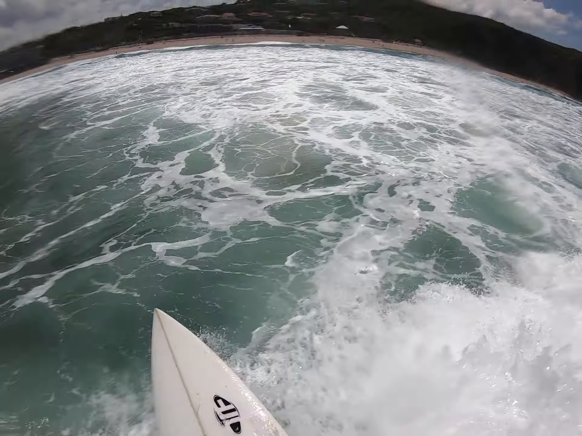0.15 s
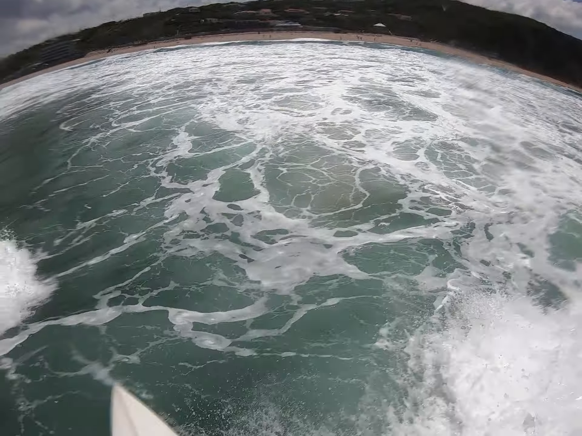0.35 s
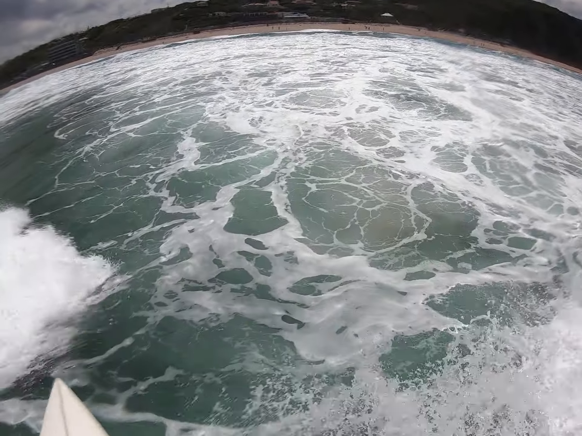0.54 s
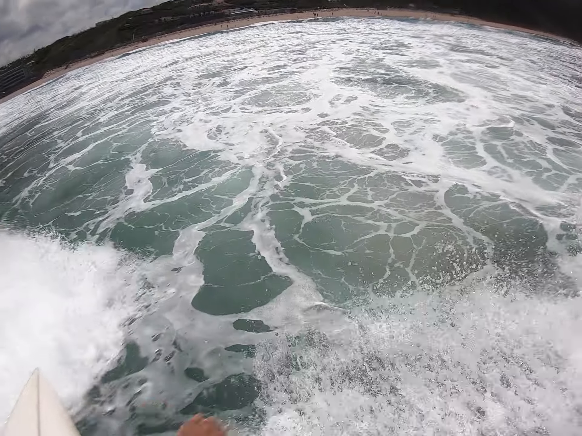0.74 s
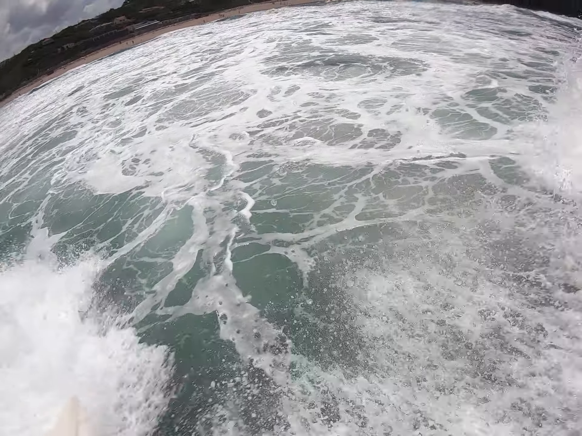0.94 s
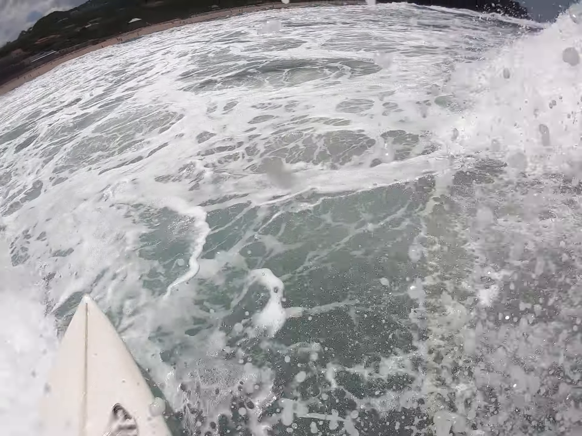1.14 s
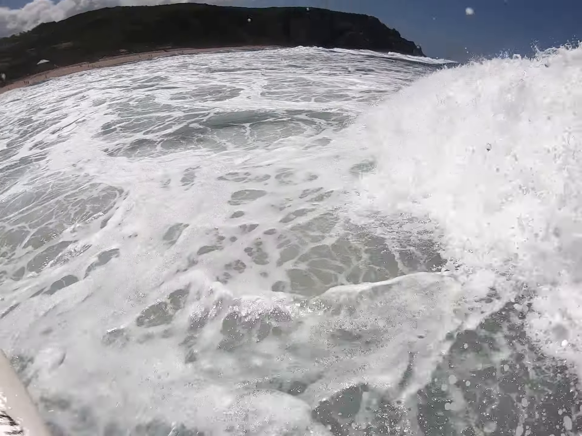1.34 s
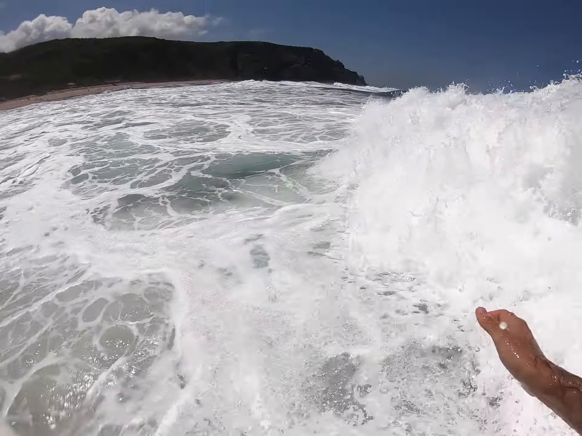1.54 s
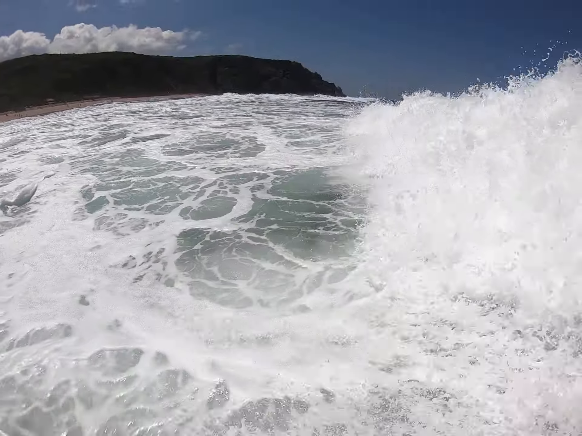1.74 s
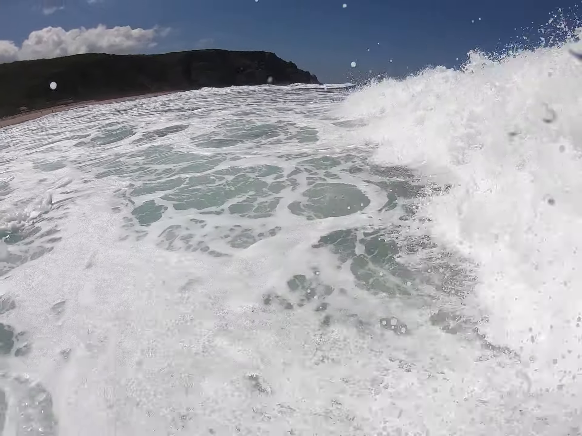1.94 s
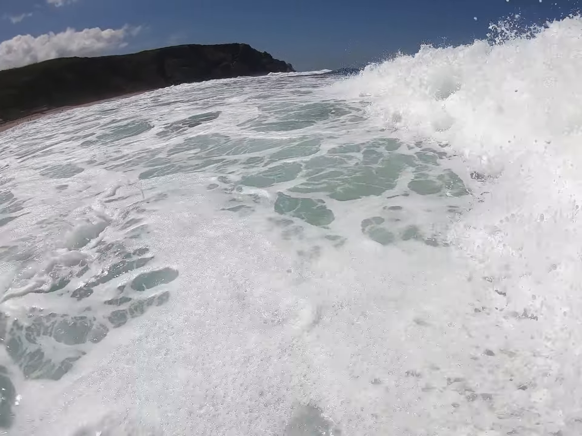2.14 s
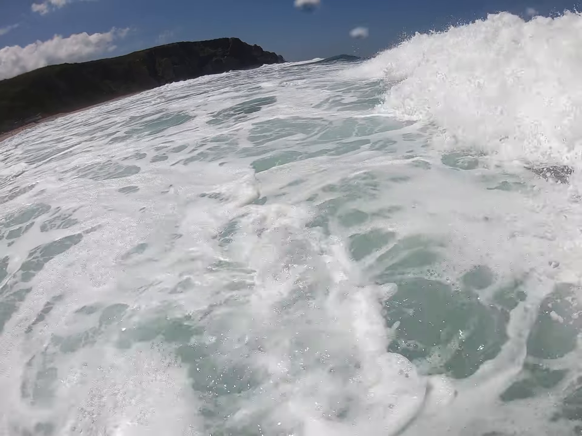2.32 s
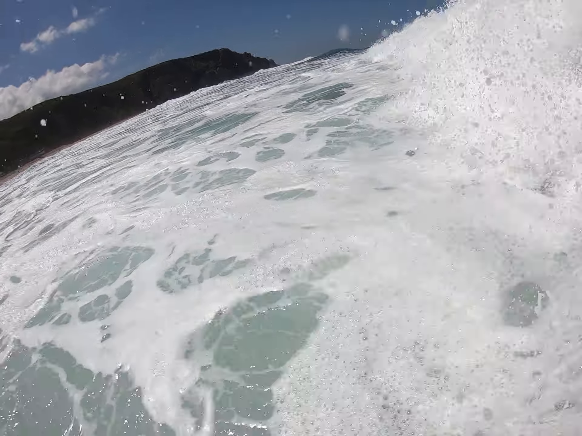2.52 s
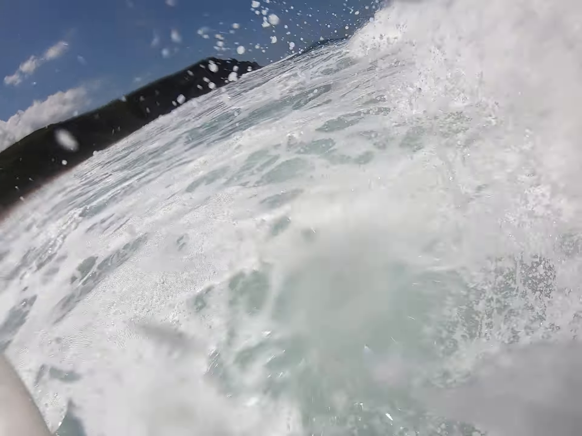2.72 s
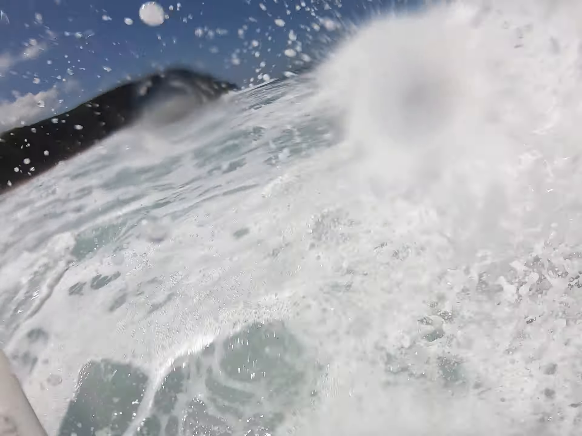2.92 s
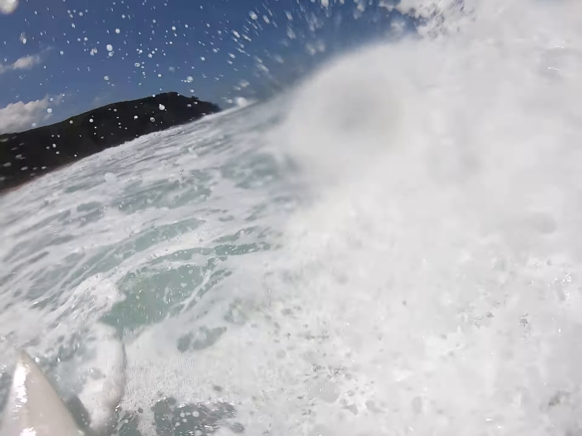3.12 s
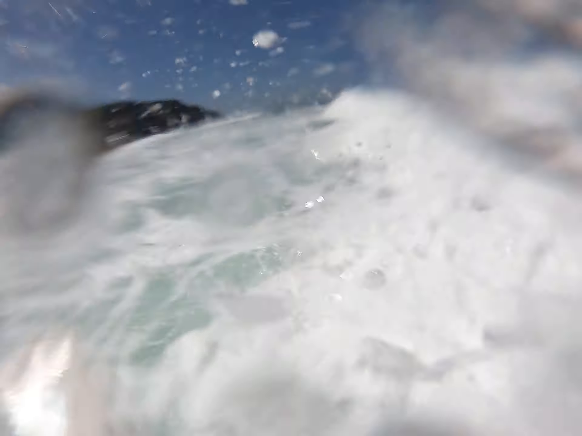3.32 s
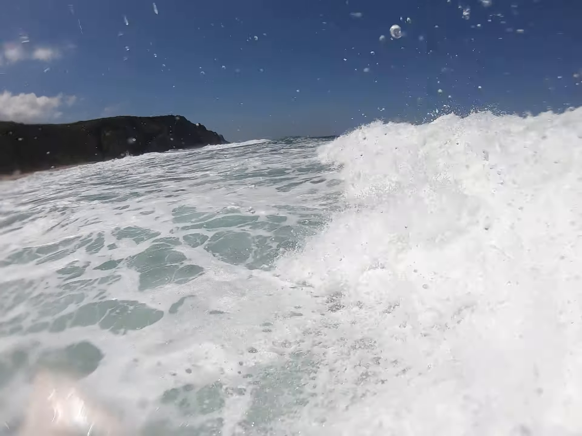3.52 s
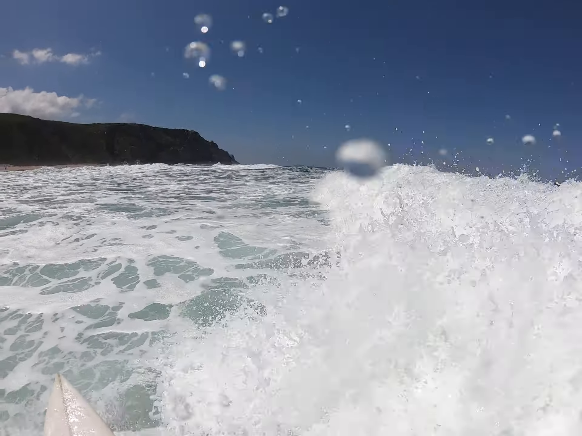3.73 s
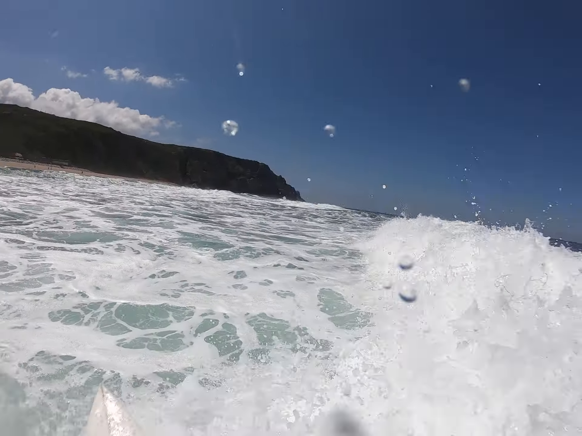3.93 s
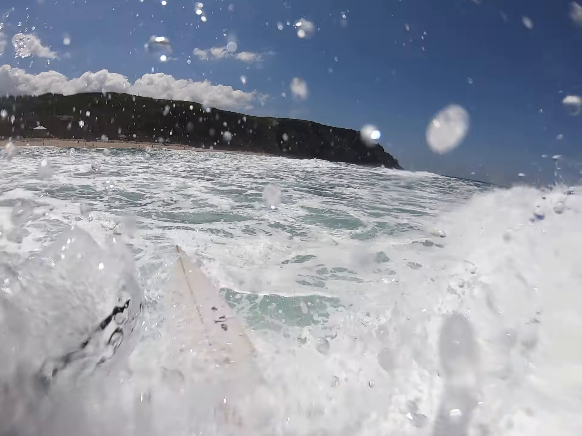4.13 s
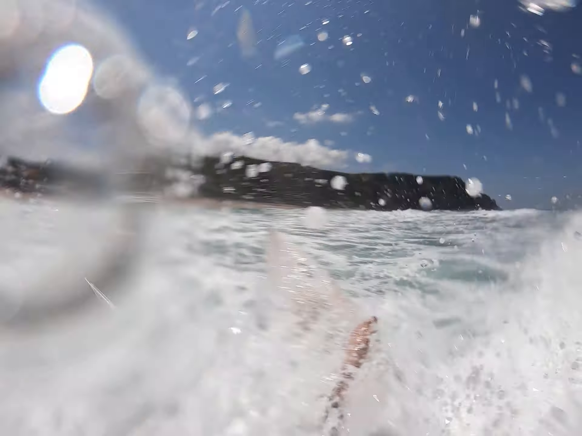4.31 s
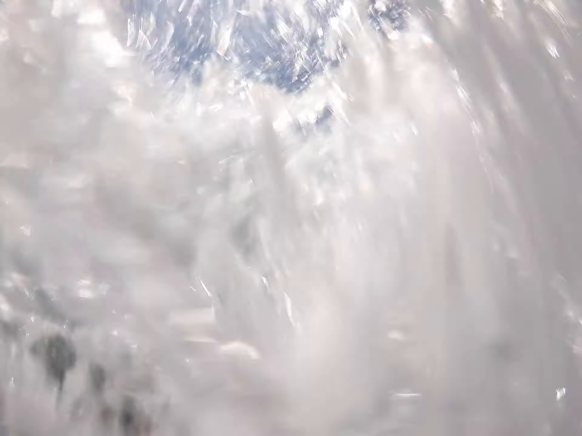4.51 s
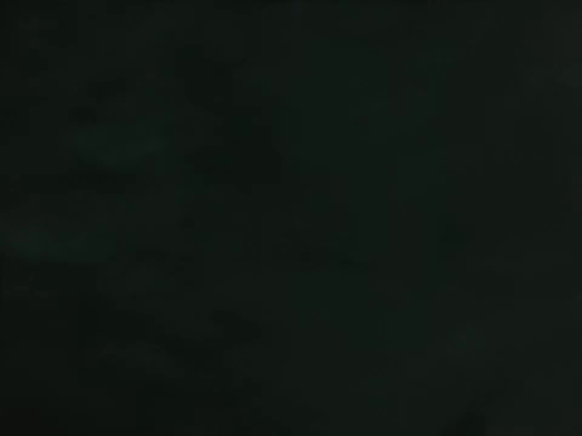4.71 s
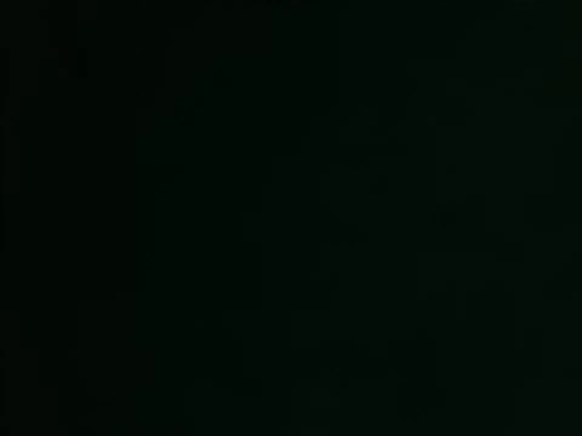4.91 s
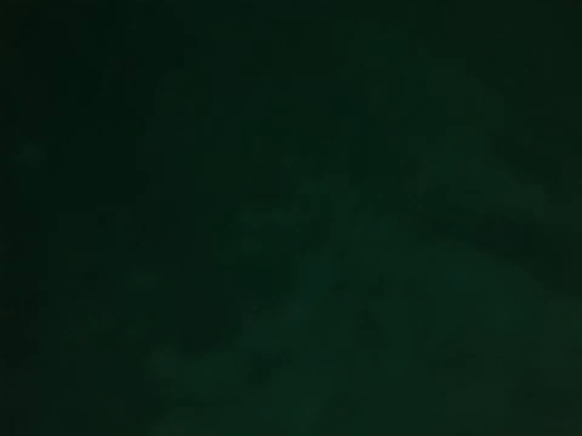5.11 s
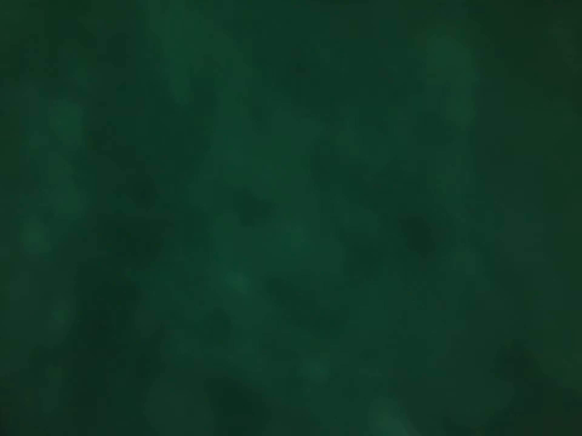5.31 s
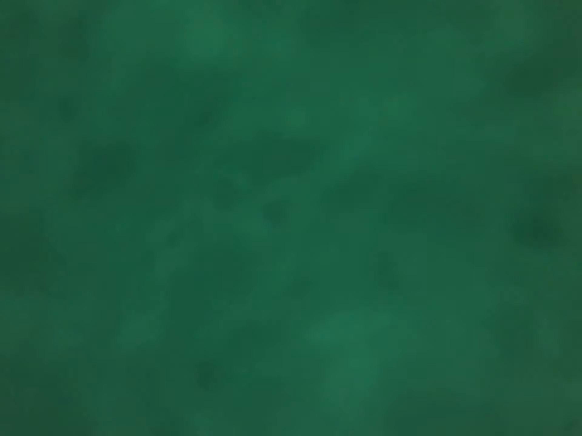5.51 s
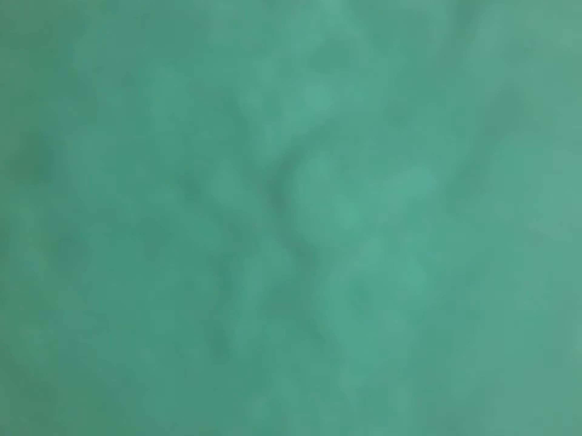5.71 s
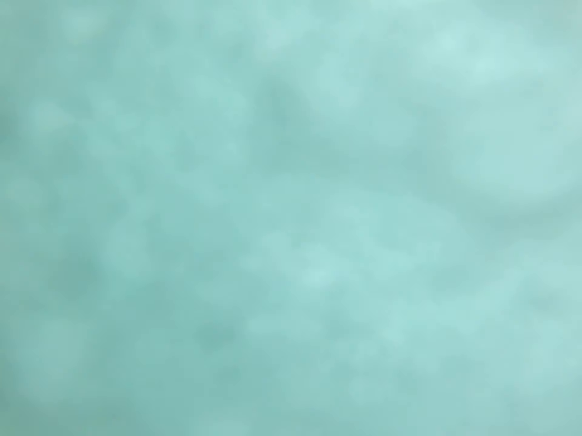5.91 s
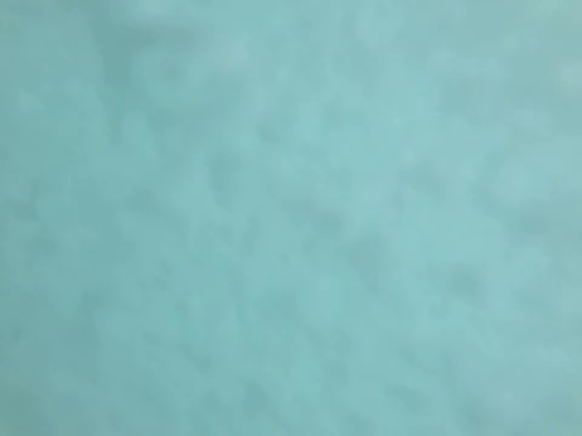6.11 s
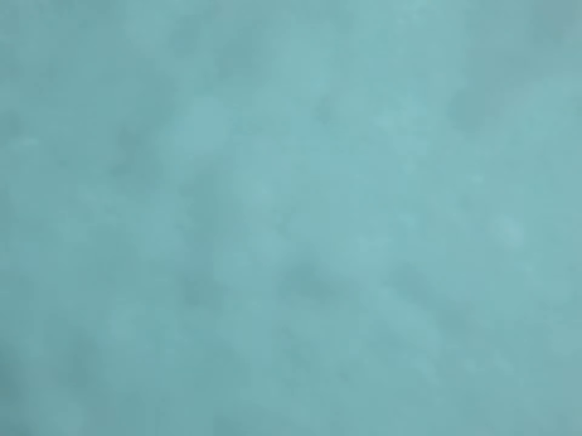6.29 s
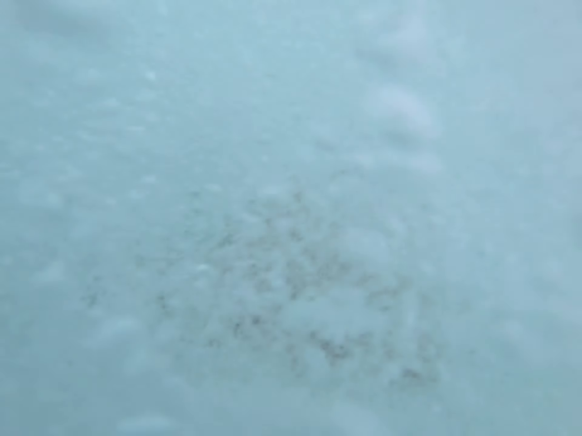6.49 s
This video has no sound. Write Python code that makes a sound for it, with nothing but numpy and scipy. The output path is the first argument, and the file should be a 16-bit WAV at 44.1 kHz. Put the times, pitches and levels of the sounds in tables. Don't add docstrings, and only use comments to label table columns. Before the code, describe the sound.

Surf roars dully as spray hisses and waves slap a waterproof case, which dives with gurgling blows before fading to soft, sparse bubbles.

```python
import sys
import numpy as np
from scipy import signal
from scipy.fft import rfft, irfft, next_fast_len
from scipy.io import wavfile
from scipy.ndimage import uniform_filter1d, map_coordinates

SR = 44100
rng = np.random.default_rng(int(sys.argv[2]) if len(sys.argv) > 2 else 0)


def master_out(mix):
    frames = np.transpose(np.atleast_2d(mix))
    ceiling = np.clip(frames, -1, 1)
    pcm = np.round(ceiling * 32767).astype(np.int16)
    wavfile.write(sys.argv[1], SR, pcm)


def ratio(d):
    e = np.asarray(d, float) / 20
    return 10 ** e


N = 288855
TIME = np.arange(N) / SR
CLOCK = np.arange(0, N / SR, .002)
SHEET_RISE_S, SHEET_FALL_S = 0.081, 0.014
DEEP_S = 5.79

# (t/s, length/s, level/dB)
SHEETS = [
    (0.114, 0.31, -41),
    (0.438, 0.14, -55.5),
    (0.76, 0.42, -53.5),
    (1.846, 0.12, -41),
    (1.999, 0.23, -42.5),
    (2.27, 0.052, -47),
    (3.538, 0.085, -47.5),
    (6.545, .05, -61),
]
# (t/s, share under water/0-1)
FLOOD = [
    (0, 0),
    (4.15, 0.05),
    (4.3, 1),
    (4.6, 0.7),
    (5.1, 0.94),
    (6.55, 0.79),
]


def unit(x):
    return x / np.sqrt(np.mean(x ** 2) + 1e-20)


def along(points, hz):
    f, v = np.transpose(points)
    return np.interp(np.log(hz + 1), np.log(f + 1), v)


def curves(rows):
    s, *cols = np.transpose(rows)
    return [np.interp(TIME, s, c) for c in cols]


def wobble(rate):
    knots = rng.standard_normal(int(N * rate / SR) + 4)
    return map_coordinates(knots, [np.arange(N) * rate / SR])


def coloured(x, spectrum):
    m = next_fast_len(N + 8192)
    return irfft(rfft(x, m) * ratio(along(spectrum, np.fft.rfftfreq(m, 1 / SR))), m)[:N]


def churn(patchy_db, lump_db, lump_rate, grain_db):
    z = signal.stft(rng.standard_normal(N), nperseg=512)[2]
    field = uniform_filter1d(uniform_filter1d(rng.standard_normal(z.shape), 6, 0), 8, 1)
    noise = signal.istft(z * ratio(patchy_db * unit(field)), nperseg=512)[1][:N]
    hit = rng.random(N) < 250 / SR
    size = ratio(5.3 * np.clip(rng.standard_normal(N), -3, 1.5))
    grains = hit * rng.standard_normal(N) * size
    return unit(unit(noise) * ratio(lump_db * wobble(lump_rate)) + ratio(grain_db) * unit(grains))


def rings(seconds, db, hz, cycles, rise, onset=.54):
    t = np.arange(SR // 12) / SR
    turns = t * np.asarray(hz)[:, None]
    u = turns / cycles
    phase = 2 * np.pi * cycles * (u + rise * u * u / 2)
    decay = ratio(np.asarray(db)[:, None] - 60 * u)
    wave = decay * np.sin(phase) * (1 - np.exp(-(turns / onset) ** 2))
    at = np.round(np.asarray(seconds) * SR).astype(int)[:, None] + np.arange(len(t))
    return np.bincount(at.ravel(), wave.ravel(), N + SR)[:N]


def swells(start, hold, rise, fall):
    start, hold, rise, fall = (np.reshape(v, (-1, 1)) for v in (start, hold, rise, fall))
    away = np.maximum((start - CLOCK) / rise, (CLOCK - start - hold) / fall)
    return ratio(-20 * np.clip(away, 0, 20))


def power(db):
    return ratio(2 * db)


def water_state():
    # (t/s, force level/dB, port open to the slosh/dB, foam level/dB, spray in air level/dB)
    flow = [(0, -20, 0, -36, -66), (0.45, -21, -1.5, -32, -50.5), (0.85, -26, 0.5, -36, -45.5),
            (1.2, -17.5, -3, -29.5, -43), (1.65, -22, 1, -31, -52), (2.3, -19, -1.5, -30.5, -43.5),
            (2.661, -20.5, -0.5, -30.5, -47), (3.12, -15, -4.5, -36.5, -53.5),
            (3.301, -22, 2.5, -34.5, -44.5), (3.66, -23.5, -8.5, -39, -54),
            (3.879, -28, -4.5, -41.5, -55.5), (4.298, -25, -1.5, -35, -60.5),
            (4.55, -29.5, -1.5, -36, -55.5), (4.69, -36, -1, -40.5, -54), (5.019, -19, -3, -38, -53.5),
            (5.33, -20.5, -32, -36, -50.5), (5.7, -29, 1, -36.5, -44.5), (5.821, -40.5, -5, -55, -66.5),
            (6.55, -31.5, -10.5, -64, -68.5)]
    # (t/s, force level/dB, rise/s, fall/s, crest spray level/dB)
    surges = [(1.251, -27, 0.06, 0.096, -45.5), (2.419, -21, 0.061, 0.18, -68.5),
              (2.768, -19, 0.094, 0.11, -42.5), (2.89, -19, 0.049, 0.085, -44),
              (3.385, -12, 0.052, 0.039, -43), (4.18, -13.5, 0.035, 0.044, -41),
              (4.248, -6.5, 0.0097, 0.0084, -44), (4.639, -11.5, 0.1, 0.016, -39),
              (4.719, -13, 0.013, 0.018, -58), (4.759, -10.5, 0.036, 0.12, -39),
              (4.907, -14, 0.064, 0.042, -45), (5.15, -18.5, 0.12, 0.0951, -43.5),
              (5.45, -23, 0.039, 0.047, -54), (5.635, -24, 0.092, 0.092, -60),
              (6.17, -40.5, 0.16, 0.069, -87)]
    # (t/s, length/s, level/dB, f/Hz)
    songs = [(1.379, 0.1091, -20, 470.8), (1.469, 0.132, -18.5, 620), (1.612, 0.203, -27.5, 650),
             (2.017, .28, -23.5, 720), (3.199, .1, -28, 780), (3.235, .09, -22.5, 520),
             (3.338, .055, -16.5, 640), (3.506, .075, -15, 800), (3.59, .045, -18, 770),
             (3.664, .14, -28, 720), (3.94, 0.088, -32, 740), (4.714, .032, -12.5, 600),
             (5.168, .1, -23, 900), (5.299, .1, -31, 850), (5.423, .065, -22.5, 820),
             (5.514, .055, -19.5, 820), (3.397, 0.02945, -20.5, 682.8), (5.599, 0.064, -23, 740),
             (6.129, 0.11, -32.5, 620), (5.853, 0.99, -40.5, 600)]
    rest_hz = 618.4

    s, *columns = np.transpose(flow)
    force, port, foam, air = (np.interp(CLOCK, s, c) for c in columns)

    s, blow, rise, fall, crest = np.transpose(surges)
    surge = swells(s, 0, rise, fall)
    blows = power(blow) @ surge
    crests = power(crest) @ surge ** 1.6
    crest_wash = power(crest + 17) @ surge
    crest_mist = power(crest - 6.5) @ surge ** 1.5

    s, length, db = np.transpose(SHEETS)
    sheets = power(db) @ swells(s, length, SHEET_RISE_S, SHEET_FALL_S)
    drain = power(-49) * swells(3.69, .44, SHEET_RISE_S, SHEET_FALL_S)[0]

    s, length, db, hz = np.transpose(songs)
    sung = power(db)[:, None] * swells(s, length, rise=0.00776, fall=0.01023)
    rest = power(foam + 5.5) + power(-6.5) * blows
    ring = rest + sung.sum(0)
    pitch = (rest_hz * rest + hz @ sung) / ring

    thud = power(force) + blows
    slosh = power(force + port) + power(-3.5) * blows
    wash = power(foam) + crest_wash + power(11) * sheets
    muffle = power(-2 * np.interp(CLOCK, *np.transpose(FLOOD)))
    hiss = (power(air) + crests) * muffle + sheets + drain
    steady_mist = power(-59.5 + 0.58 * (air + 50))
    mist = steady_mist + crest_mist + power(-8.5) * sheets
    levels = 10 * np.log10([thud, slosh, ring, wash, hiss, mist])
    return curves(np.transpose([CLOCK, pitch, *levels]))


def sea():
    # (f/Hz, level/dB per Hz)
    far_surf = [(10, -27.5), (40, -0.5), (250, -3), (650, -5.5), (900, -30.5), (2000, -41.5), (3300, -56.5),
                (4000, -76.5), (7000, -120)]
    roar = churn(patchy_db=1.5, lump_db=0.5, lump_rate=15, grain_db=-17.5)
    return ratio(-34) * unit(coloured(roar, far_surf))


def whistle():
    # (t/s, f/Hz, level/dB)
    jet = [
        (.42, 7600, -90),
        (.46, 7500, -76),
        (.6, 6900, -77),
        (.71, 6500, -75),
        (.74, 6400, -95),
    ]
    hz, db = curves(jet)
    phase = 2 * np.pi * np.cumsum(hz) / SR
    return ratio(db) * unit(wobble(500) * np.cos(phase) + wobble(500) * np.sin(phase))


def puffs():
    # (t/s, half width/s, level/dB, f/Hz)
    fizz = [
        (4.668, .012, -63, 5800),
        (4.708, 0.012, -55, 5500),
        (4.8, .01, -59, 5600),
        (4.83, 0.01, -60, 5600),
        (5.842, .01, -76, 5750),
        (4.76, .015, -45.5, 4200),
    ]
    a, b = unit(wobble(800)), unit(wobble(900))
    out = np.zeros(N)
    for s, width, db, hz in fizz:
        turn = 2 * np.pi * hz * TIME
        swell = np.exp(-((TIME - s) / width) ** 2)
        out += ratio(db) * swell * (a * np.cos(turn) + b * np.sin(turn))
    return out


def sheen():
    # (f/Hz, level/dB per Hz)
    case_bands = [(1300, -37), (1600, -8.5), (1850, 1), (2150, -17), (3700, -23.5), (3950, -34),
                  (4300, -23.5), (4900, -38.5), (6200, -37.5), (9500, -68)]
    s, length, db = np.transpose(SHEETS)
    level = np.sqrt(power(db + 6.5) @ swells(s, length, SHEET_RISE_S, SHEET_FALL_S))
    hiss = churn(patchy_db=1.5, lump_db=1.8, lump_rate=17, grain_db=-26.0)
    band = [(700, -120)] + case_bands + [(14000, -120)]
    return np.interp(TIME, CLOCK, level) * unit(coloured(hiss, band))


def snaps():
    # (t/s, peak level/dB, f/Hz)
    snapping_foam = [(4.5992, -21, 1800), (4.6212, -27, 2030), (4.6431, -30, 2000), (4.6661, -29, 1890),
                     (4.7065, -24, 1940), (4.7284, -15, 2010), (4.7534, -21, 1800), (4.8133, -21, 1840),
                     (4.8601, -21, 1870), (4.9405, -27, 1940), (4.9819, -38, 2070), (4.9963, -37, 1940),
                     (5.395, -33, 1610), (5.4211, -26, 1550), (5.431, -28, 1570), (5.5183, -24, 1520),
                   (5.539, -22, 1700), (5.5592, -23, 1680), (5.603, -37, 1750), (5.6156, -30, 1620),
                   (5.6336, -26, 1620), (5.648, -25, 1630), (5.7119, -36, 1640), (5.7675, -37, 1800)]
    # (t/s, peak level/dB, f/Hz)
    sparks = [(1.2206, -47, 4300), (1.2436, -42, 4570), (1.2564, -45, 4820), (1.28, -53, 4330),
              (3.8756, -51, 4600), (3.9694, -48, 4640), (4.0213, -60, 4700), (6.0741, -61, 4320),
              (6.1389, -49, 4350), (6.1789, -52, 4890), (6.32, -59, 4370), (6.4532, -48, 4680)]
    s, db, hz = np.transpose(snapping_foam + sparks)
    return rings(s - .001, db + 12, hz, cycles=14, rise=.1, onset=2.4)


def froth(count=900):
    # (t/s, level/dB)
    swarm_level = [
        (0, -70),
        (4.5, -52.5),
        (4.75, -35),
        (5.2, -44),
        (5.6, -30),
        (5.78, -49.5),
        (6.03, -52.5),
        (6.18, -41.5),
        (6.3, -80),
        (6.55, -45),
    ]
    # (t/s, peak level/dB, f/Hz)
    pops = [(1.002, -1.5, 1160), (1.211, 0, 1230), (1.28, -1.5, 1320), (1.3066, 0.5, 1000),
            (1.604, -4.5, 1180), (2.3864, -28, 1350), (2.567, 2.5, 1100), (3.129, -11.5, 1220),
            (3.2781, -13, 1090), (3.3258, -5.5, 1440), (3.348, -8, 1410), (3.388, -11, 1575),
            (3.404, -14, 1280), (3.4244, -21, 1080), (4.059, -13.5, 1140), (4.121, -7.5, 1200),
            (5.12, -9.5, 1210), (5.151, -8, 1610), (5.433, -5.5, 960), (5.8085, -22, 1050),
            (5.9474, -30, 1380), (5.9723, -24, 1230), (6.038, -31, 1240), (6.4606, -28, 1480),
            (6.504, -28, 1050), (4.164, -3.5, 970), (4.1937, 0.5, 1075), (4.2438, -6, 1210),
            (4.4193, -7.5, 950), (4.621, -21, 984), (4.6436, -24, 1000), (5.097, -8, 1070),
            (5.767, -15.5, 1150), (5.896, -20.5, 1130), (5.995, -16, 950), (6.065, -19.5, 1120),
            (6.154, -17, 1260), (6.195, -16, 1140), (6.257, -16.5, 1360), (6.434, -24, 1370)]
    when, tone, size = rng.random((3, count))
    clump = np.round(when * N / SR / .03) * .03
    s = np.clip(clump + 0.011 * rng.standard_normal(count), 0, N / SR)
    hz = 950 * (4800 / 950) ** (tone ** 1.1)
    db = -3.2 * np.log(size + .02) - 14 * np.log2(hz / 950)
    swarm = unit(rings(s, db, hz, cycles=20, rise=.2, onset=1.5))
    pop_s, pop_db, pop_hz = np.transpose(pops)
    bursts = rings(pop_s, pop_db - 4.0, pop_hz, cycles=13.4, rise=0.12, onset=0.7)
    return ratio(curves(swarm_level)[0]) * swarm + bursts


def spits():
    # (t/s, peak level/dB, length/s)
    cracks = [(1.2436, -40, 0.008), (1.2564, -50, 0.006), (6.106, -54, 0.011), (4.394, -58, 0.006),
              (5.615, -48, 0.008), (6.183, -62, 0.012), (2.883, -45, 0.0082), (3.3615, -37, 0.016),
              (3.383, -47, 0.011), (3.401, -50, 0.011), (3.4215, -42.5, 0.012), (4.177, -42, 0.01),
              (4.199, -54, 0.012), (4.587, -48.5, 0.011), (4.596, -44.5, 0.011), (4.615, -40, 0.014),
              (4.623, -35, 0.02), (4.643, -37.5, 0.016), (4.6644, -45.5, 0.012), (4.707, -42, 0.014),
              (4.734, -39, 0.014), (4.754, -29.5, 0.014), (4.763, -38, 0.011), (4.7714, -46, 0.012),
              (4.785, -48.5, 0.012), (4.8164, -48, 0.019), (4.938, -46, 0.01), (4.948, -44.5, 0.0091),
              (4.977, -53.5, 0.009), (5.188, -50, 0.018), (5.273, -47.5, 0.017)]
    # (f/Hz, level/dB per Hz)
    spit_spectrum = [(1500, -41), (2500, 0), (4000, 0), (6000, -10.5), (8000, -19), (10000, -27),
                     (12000, -49), (15000, -77.5)]
    s, db, length = (np.reshape(v, (-1, 1)) for v in np.transpose(cracks))
    t = np.arange(SR // 16) / SR
    shape = ratio(db + 4 - 36 * t / length) * (1 - np.exp(-(t / .0012) ** 2))
    at = np.round(s * SR).astype(int) + np.arange(len(t))
    envelope = np.bincount(at.ravel(), shape.ravel(), N + SR)[:N]
    return envelope * unit(coloured(rng.standard_normal(N), spit_spectrum))


def drops():
    # (t/s, peak level/dB, ring f/Hz, dull part level/dB, unheard)
    shell_drops = [(0.9353, -22.5, 1860, -7), (0.9906, -20, 1910, 9), (1.2438, -14, 2520, 18),
                   (2.2862, -23, 1890, 22), (2.5635, -20.5, 2280, 36), (2.6066, -34, 2300, 1),
                   (2.786, -29.5, 2090, 8.5), (2.8632, -34.5, 2040, 15.5), (2.884, -17, 2030, 17),
                   (3.035, -33, 1820, 3), (3.3642, -16.5, 1880, 8), (4.598, -28, 1910, 26.5),
                   (4.625, -39.5, 2350, 1), (4.7287, -17.5, 2220, 23), (4.7876, -28, 1840, 12),
                   (4.941, -18.5, 1800, 27), (4.9465, -44.5, 2600, -3), (5.185, -28.5, 2380, -6),
                   (5.2185, -24.5, 1920, 9), (5.2884, -27, 1880, 5), (5.4352, -25, 1960, 6),
                   (5.636, -26.5, 1920, 20.5), (6.0566, -46, 2236, 10), (6.096, -48, 1840, -2),
                   (6.1088, -35.5, 2200, -2), (6.14, -34.5, 1900, 9), (6.1778, -39, 2020, 9),
                   (6.235, -43, 2810, -2), (6.2505, -32, 2070, 24), (6.321, -42, 2490, -8),
                   (5.768, -34, 1890, -5), (5.997, -38, 2880, -2), (6.073, -49, 2610, -3),
                   (6.155, -43, 2100, -5), (6.199, -42, 2080, -7), (6.271, -47, 2980, -8)]
    # (f/Hz, level/dB)
    shell = [(300, -33), (1000, -9.5), (2500, 3), (4000, -16.5), (6500, -31), (10000, -47.5), (13000, -100)]
    s, db, hz, _ = np.transpose(shell_drops)
    blows = np.bincount(np.round(s * SR).astype(int), ratio(db), N)[:N]
    t = np.arange(SR // 20) / SR
    decay = ratio(4 - 60 * t / 0.022) * (1 - np.exp(-(t / .0009) ** 2))
    noise = unit(coloured(rng.standard_normal(N), shell))
    splat = signal.fftconvolve(blows, decay)[:N] * noise
    splat = coloured(splat, [(400, -51), (900, 3.5), (10000, -12.0), (14000, -59.0)])
    return ratio(-4.5) * splat + rings(s, db + 13, hz, cycles=13, rise=0.2, onset=2.4)


def spray(wash_db, spray_db, mist_db):
    # (f/Hz, level/dB per Hz)
    open_wash = [(500, -18.5), (850, 0), (933, -1.5), (1100, -4), (1360, -3.5), (1820, -8), (2600, -22.5),
                 (3380, -63), (5720, -120)]
    # (f/Hz, level/dB per Hz)
    sunk_wash = [(500, -18.5), (850, -9.5), (1060, -5.5), (1480, -15), (1650, -18.5), (2600, -31.5),
                 (3380, -53.5), (5720, -120)]
    # (f/Hz, level/dB per Hz)
    spray_band = [(1200, -120), (1700, -26.5), (2200, 2), (2500, -2.5), (3100, 0), (3350, -5.5),
                  (3550, -27.5), (4000, -45), (5000, -120)]
    # (f/Hz, level/dB per Hz)
    mist_band = [(2400, -120), (3000, -26), (3500, -3.5), (3950, -5), (4250, -5.5), (4800, -8),
                 (5200, -12.5), (6200, -15.5), (7000, -18.5), (9000, -23), (10000, -33), (11500, -53),
                 (14000, -120)]
    # (f/Hz, level/dB)
    dark_mist = [(4800, -3), (5300, -8), (5600, -40)]

    flood = np.clip(curves(FLOOD)[0], 0, 1)
    burst = ratio((.5 + 1.3 * flood) * (wobble(22) + wobble(45)) / 1.5)
    foam = churn(patchy_db=2.5, lump_db=0.06, lump_rate=25, grain_db=-12)
    in_air = (1 - flood) * unit(coloured(foam, open_wash))
    under_water = flood * unit(coloured(foam, sunk_wash))
    wash = unit(burst) * (in_air + under_water)

    hiss = churn(patchy_db=2.6, lump_db=.8, lump_rate=30, grain_db=-14)
    mist = unit(burst * coloured(hiss, mist_band))
    deep = np.clip(1 + (TIME - DEEP_S) / .14, 0, 1) ** .5
    mist = (1 - deep) * mist + deep * coloured(mist, dark_mist)
    drizzle = unit(burst * coloured(hiss, spray_band))
    return ratio(wash_db + 3.0) * wash + ratio(spray_db - 2.1) * drizzle + ratio(mist_db - 5.5) * mist


def pocket(level_db, pitch_hz, slosh_db):
    # (t/s, peak level/dB, f/Hz)
    gulps = [(3.366, -3, 750), (3.377, -5.5, 820), (4.51, -12, 650), (4.627, -3.5, 405), (4.646, -3, 324),
             (4.59, -11, 525), (1.604, -4, 620), (2.385, -15, 690), (5.095, -11, 800), (4.243, -18, 600),
             (4.714, -7, 390), (4.774, -5, 371), (4.818, -6.5, 417), (4.9, -14, 396), (3.508, -13, 745),
             (3.684, -17, 647), (3.705, -5.5, 582), (3.944, -33, 695), (4.162, -13, 387), (4.315, -9, 524),
             (4.421, -8, 560), (4.705, 0, 564), (4.853, -21, 586), (4.983, -24, 530), (5.151, -14, 413),
             (5.338, -26, 700), (5.374, -11, 1010), (5.417, -12, 643), (5.841, -16, 714), (5.97, -18, 670),
             (6.301, -17.5, 580), (6.403, -18.5, 550), (6.471, -17, 605), (6.52, -25, 634)]
    # (t/s, looseness/0-1)
    looseness = [
        (0, .1),
        (4.15, .1),
        (4.3, .75),
        (5.7, .75),
        (5.8, .25),
        (6.55, .25),
    ]
    # (f/Hz, level/dB)
    deep_loss = [(10, 0), (740, 0), (830, -14), (1500, -14), (3000, -40), (20000, -80)]
    band = [(200, -120), (380, -38), (480, 2), (850, 3.5), (950, -32.5), (1100, -30.5), (2000, -120)]

    phase = 2 * np.pi * np.cumsum(pitch_hz * (1 + .05 * wobble(30))) / SR
    share, = curves(looseness)
    tight = wobble(200) * np.cos(phase) + wobble(200) * np.sin(phase)
    loose = wobble(520) * np.cos(phase) + wobble(520) * np.sin(phase)
    narrow = coloured(np.sqrt(1 - share) * tight + np.sqrt(share) * loose, [(2000, 0), (5000, -50)])
    broad = coloured(churn(patchy_db=-2.0, lump_db=2.0, lump_rate=30, grain_db=-10.0), band)
    focus = 1 / (1 + ratio(-1.5 * (level_db - slosh_db - 1)))
    ring = np.sqrt(focus) * unit(narrow) + np.sqrt(1 - focus) * unit(broad)
    ring = np.where(np.arange(N) < DEEP_S * SR, ring, coloured(ring, deep_loss))
    s, db, hz = np.transpose(gulps)
    return ratio(level_db - 0.98) * ring + rings(s, db + 0.41, hz, cycles=17, rise=0.12, onset=0.65)


def pounding(thud_db, slosh_db):
    # (t/s, peak level/dB, swing f/Hz)
    slaps = [(2.89, -20, 88.8), (3.364, -2, 123), (3.408, 3, 72), (3.472, -4, 110), (3.524, -4, 100),
             (3.634, 3.5, 595), (3.64, 8.5, 497), (4.113, -1, 92), (4.199, 3.5, 119), (4.235, -1, 71),
             (4.255, 6, 250), (4.286, 3.5, 102), (4.318, 8.5, 179), (4.416, 2, 109), (4.665, 3, 154),
             (4.442, -12, 82), (4.62, 3, 97.8), (4.643, 6.5, 94.2), (4.705, -19, 571), (4.812, 2, 130),
             (4.898, -4, 200), (4.938, 7, 197), (5.158, 0, 141), (5.418, -3.5, 131), (5.436, 1, 110)]
    # (f/Hz, level/dB per Hz)
    thud_band = [(10, -24), (18, -5.5), (55, -0.5), (97, 2), (150, -1), (200, -4.5), (300, -30.5),
                 (600, -120)]
    # (f/Hz, level/dB per Hz)
    slosh_band = [(60, -120), (120, -28), (180, -0.5), (300, -1.5), (430, -4), (520, -9.5), (800, -45),
                  (1500, -120)]
    s, db, hz = np.transpose(slaps)
    thud = unit(coloured(churn(patchy_db=1.5, lump_db=1.5, lump_rate=14, grain_db=-10.0), thud_band))
    slosh = unit(coloured(churn(patchy_db=0.15, lump_db=1.97, lump_rate=25, grain_db=-9), slosh_band))
    swings = rings(s, db - 1.0, hz, cycles=4.8, rise=-0.47)
    return ratio(thud_db - 2.04) * thud + ratio(slosh_db - 0.43) * slosh + swings


def scene():
    pitch_hz, thud_db, slosh_db, pocket_db, *bright_db = water_state()
    background = sea() + whistle() + puffs() + sheen()
    shell = snaps() + froth() + spits() + drops()
    water = spray(*bright_db) + pocket(pocket_db, pitch_hz, slosh_db) + pounding(thud_db, slosh_db)
    return (background + shell + water)[None]


def top_cut(x):
    return signal.sosfilt(signal.butter(12, 12400, fs=SR, output="sos"), x)


def record(dry):
    soft = dry / (1 + np.abs(dry / .9) ** 4) ** (1 / 4)
    return top_cut(soft)


dry = scene()
out = record(dry)
master_out(out)
```